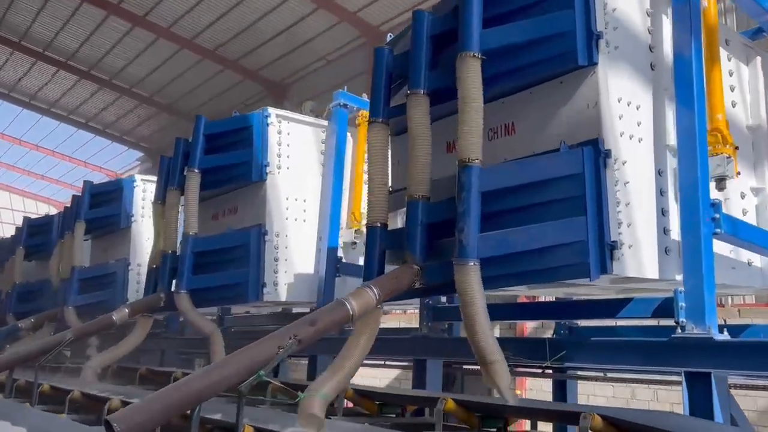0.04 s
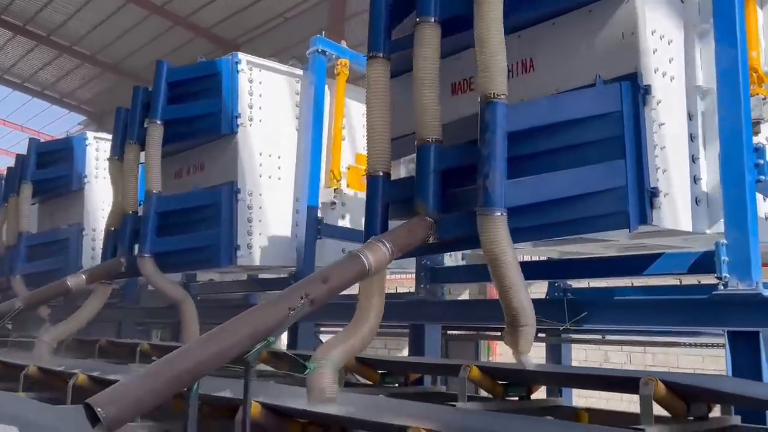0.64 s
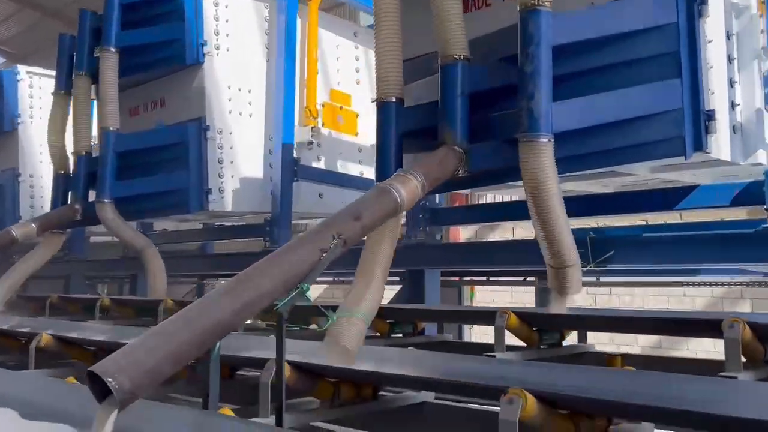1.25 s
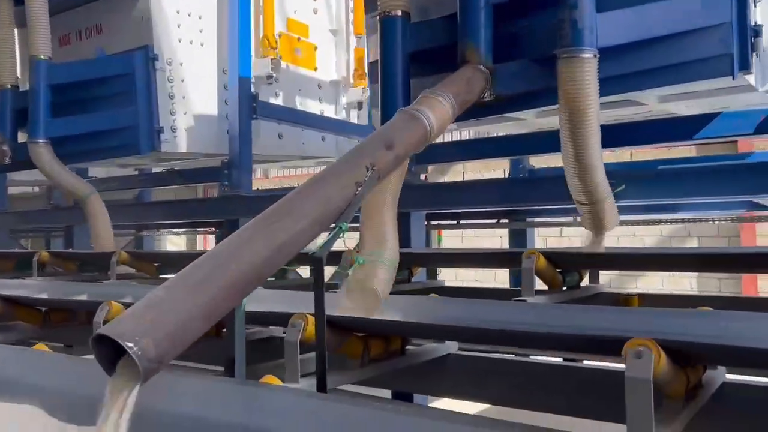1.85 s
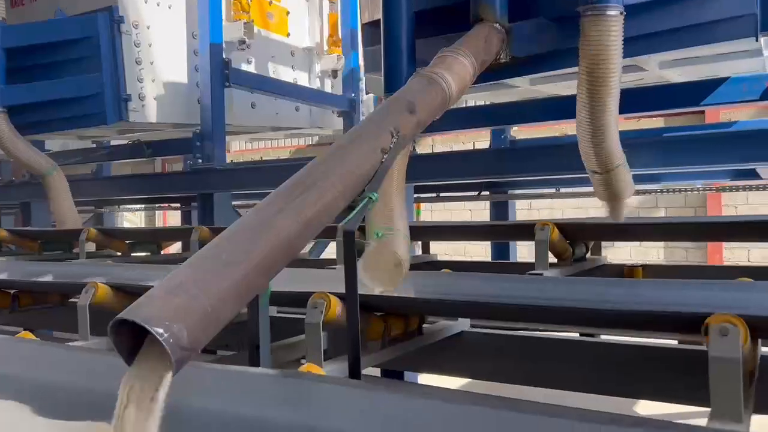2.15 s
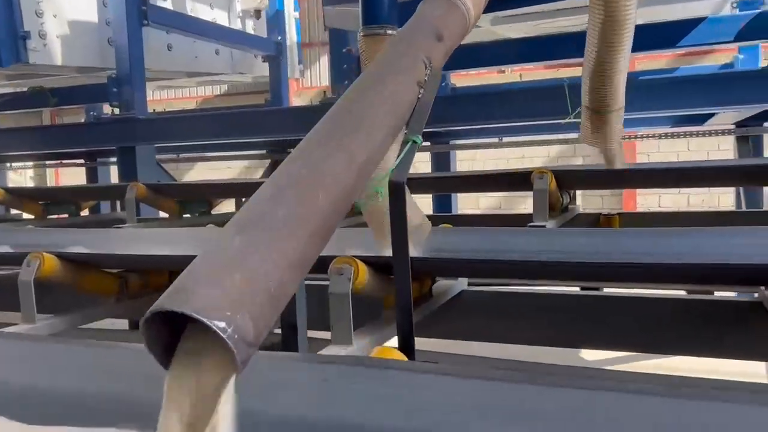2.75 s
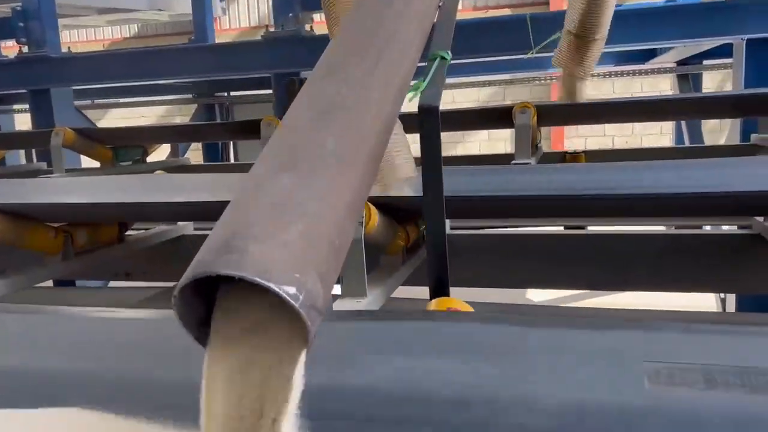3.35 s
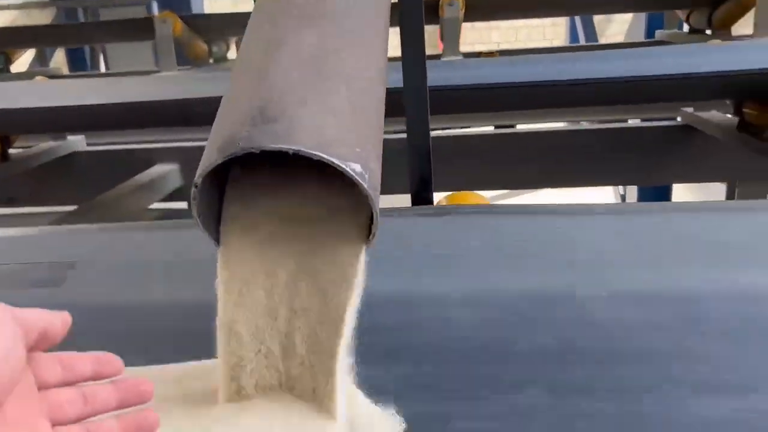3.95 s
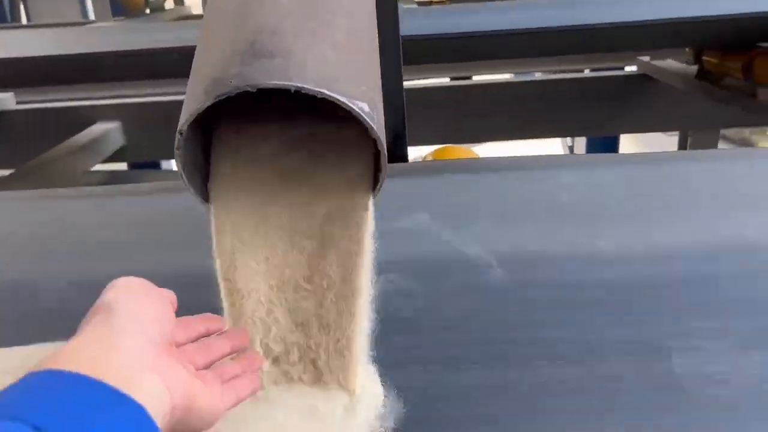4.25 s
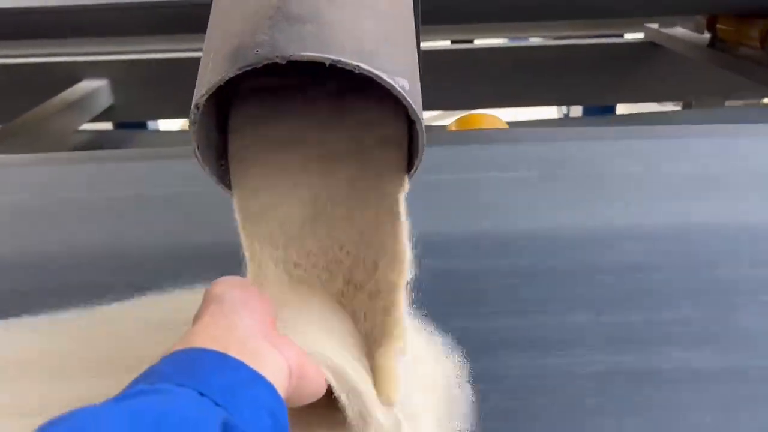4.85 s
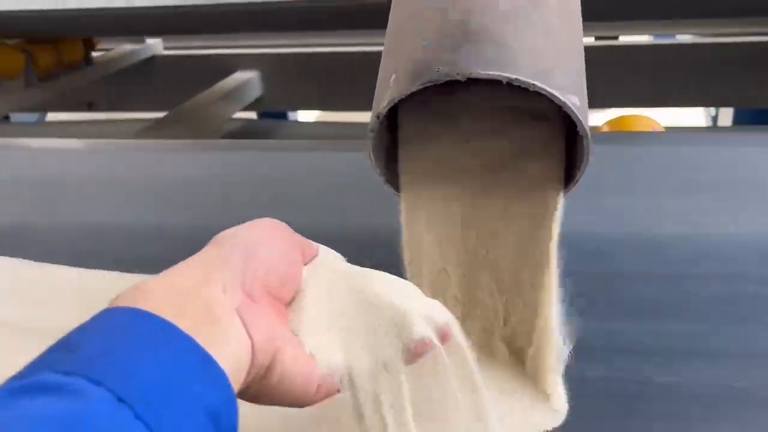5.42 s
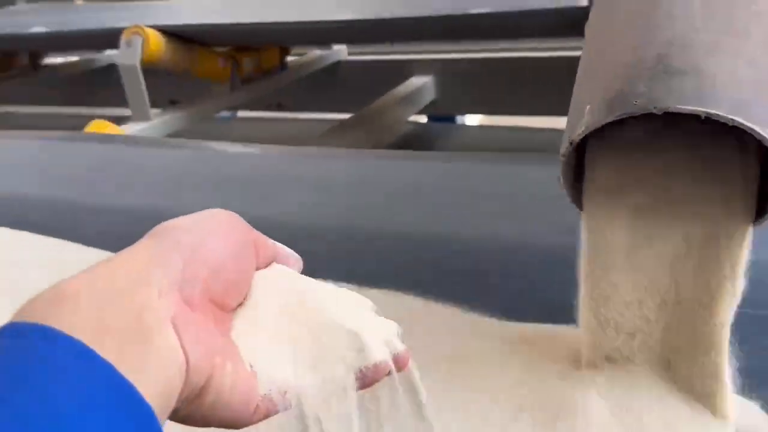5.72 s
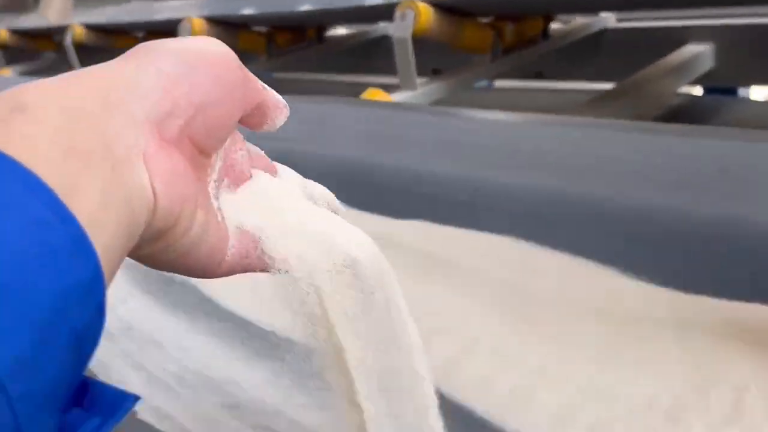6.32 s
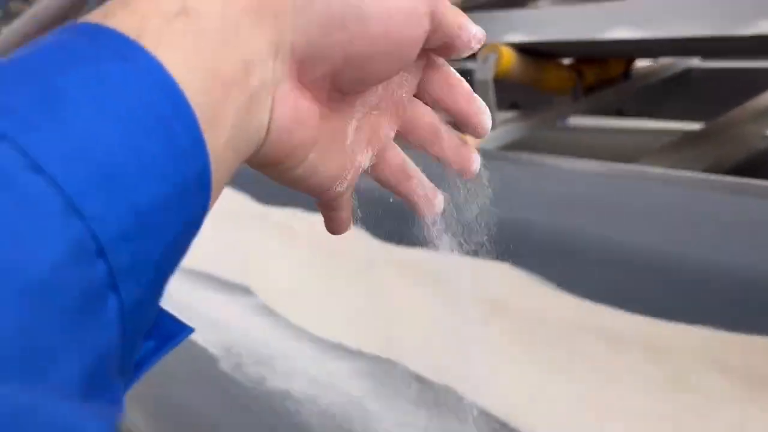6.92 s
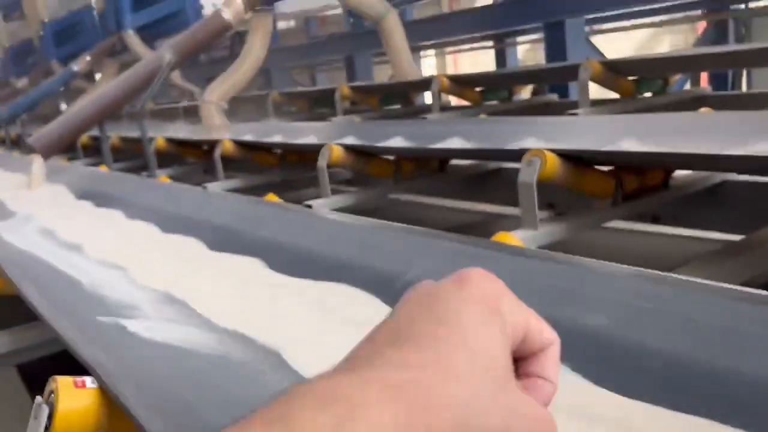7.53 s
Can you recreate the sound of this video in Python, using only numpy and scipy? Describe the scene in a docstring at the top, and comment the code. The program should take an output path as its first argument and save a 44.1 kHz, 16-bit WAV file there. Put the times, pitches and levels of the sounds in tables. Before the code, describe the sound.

Large vibrating sifters run throughout in an echoing factory hall: a deep steady roar, rattling screens and dull thumps about six times a second. A low boom and drone swell and sink, and motor bearings whine softly. Sand pouring from a pipe onto a conveyor belt adds a fine hiss, which grows as the microphone approaches, is strongest around 4.3 seconds and stays near until the end at about 7.5 seconds. Loose steel clanks and bounces in short bright clusters at about 1.1, 3, 4.8 and 6.6 seconds, the third softer and the last strongest, each ringing on in the hall. Small metal parts tick during the first two seconds. Distant steel scrapes come right at the start, then more faintly near 0.8, 2.5, 2.9 and 5.1 seconds. The bearings give brief faint squeals around 0.7, 1.7, 5.9 and 6.7 seconds.

```python
"""A row of big vibrating sifters roars, rattles and thumps in a steel hall.
Each stroke throws the load against a booming box; the frames hum and the motor bearings whine.
Sand pours from a pipe onto a conveyor belt, hissing more as the microphone comes near.
About every 1.8 s loose steel on the running line clanks and bounces, and the hall rings after it;
small parts tick and scrape in between."""
import sys
import numpy as np
from scipy import signal
from scipy.fft import rfft, irfft, next_fast_len
from scipy.io import wavfile
from scipy.ndimage import map_coordinates

SR = 44100
rng = np.random.default_rng(int(sys.argv[2]) if len(sys.argv) > 2 else 0)


def pcm_store(signal):
    """Save signal as 16-bit PCM."""
    levels = np.round(np.clip(np.atleast_2d(signal), -1, 1) * 32767)
    wavfile.write(sys.argv[1], SR, levels.astype(np.int16).T)


N = 334278

STROKE_HZ, FIRST_STROKE_S = 5.84, .135  # the beat of the sifters
# the deep roar of the sifter boxes: (frequency [Hz], relative level [dB])
ROAR_SPECTRUM = [(20, -40), (38, -26), (52, -11.5), (68, -6), (82, -9.5), (115, -4.5), (165, -0.5),
                 (200, -3.5), (240, -7), (290, -4), (350, -10.5), (500, -19.5), (800, -30.5), (2000, -86)]
# the brighter rattle of their screens: (frequency [Hz], relative level [dB])
RATTLE_SPECTRUM = [(150, -9.5), (450, 5), (700, 2.5), (1050, 1.5), (1450, -3), (2000, -6), (2400, -7),
                   (3000, -10.5), (3900, -14.5), (5400, -18.5), (7000, -19), (10000, -26), (16000, -51)]


def sifters(roar_db, rattle_db, throb_db, shake_db):
    """The boxes roar and their screens rattle, both swelling slightly with each stroke."""
    t = np.arange(N) / SR
    stroke = np.cos(2 * np.pi * STROKE_HZ * (t - FIRST_STROKE_S - THUMP_FADE_S))
    boxes = hall_noise(ROAR_SPECTRUM) * amp(roar_db + throb_db * stroke)
    screens = hall_noise(RATTLE_SPECTRUM) * amp(rattle_db + shake_db * stroke + 0.92 * wobble(14))
    return boxes * pan(db=-0.85) + screens * pan(db=0.5)


THUMP_RISE_S, THUMP_FADE_S = 0.0092, .028
# the dull thump of a stroke: (frequency [Hz], relative level [dB])
THUMP_SPECTRUM = [(50, -37), (100, -6), (155, 2.5), (185, -2), (240, -15), (330, -11.5), (600, -43),
                  (2000, -90)]
# the low notes of the box walls: (pitch [Hz], relative level [dB], pitch blur [Hz])
BOOM_TONES = [(156.5, -31.5, 2), (162.6, -38, 2), (168.5, -35, 2.172)]
# how the boom and the thumps swell and sink: (time [s], level change [dB])
BOOM_SWELL = [(0, 4.5), (.45, -11), (.7, -0.5), (1, 0.5), (2.3, 1.5), (2.8, 4), (3.9, -1), (4.3, 3.5),
              (4.7, 5.5), (5, -14), (5.35, 3), (5.85, -4), (7.2, -3.5)]


def thumps(thump_db):
    """Each stroke throws the load against the box, whose walls keep booming."""
    since_stroke = (np.arange(N) / SR - FIRST_STROKE_S) % (1 / STROKE_HZ)
    kick = unit((1 - np.exp(-since_stroke / THUMP_RISE_S)) * np.exp(-since_stroke / THUMP_FADE_S))
    thump = hall_noise(THUMP_SPECTRUM) * kick * pan(db=-0.5)
    return amp(over_time(BOOM_SWELL)) * (amp(thump_db) * thump + drifting_tones(BOOM_TONES))


# the low hum of the frames: (pitch [Hz], level [dB], pitch blur [Hz])
HUM_TONES = [(29.3, -57, .6), (90, -35, 0.7)]
# their drone around one higher note: (pitch [Hz], relative level [dB], pitch blur [Hz])
DRONE_TONES = [(290.7, -32.5, 14)]
# how the drone swells and sinks: (time [s], level change [dB])
DRONE_SWELL = [(0, -0.5), (.9, -7.5), (1.8, 2), (2.8, -1), (3.2, 6.5), (3.55, -10), (3.95, 2), (4.3, -8),
               (4.85, 5), (5.2, -4), (6.05, 5), (6.4, 2.5), (6.75, 3), (7.58, -5)]


def frames():
    """The shaking frames hum all the time; their drone swells and sinks."""
    return drifting_tones(HUM_TONES) + amp(over_time(DRONE_SWELL)) * drifting_tones(DRONE_TONES)


# the whine of the motor bearings: (pitch [Hz], relative level [dB], pitch blur [Hz])
WHINE_TONES = [(1059, -5, 6), (1260, -1, 11), (1317, -5.5, 4), (1865, -11, 4), (2752, -12, 4)]
# short squeals: (loudest moment [s], pitch [Hz], level [dB])
SQUEALS = [(.70, 1258, -44.5), (1.65, 1315, -44.5), (5.89, 1258, -43.5), (6.68, 1260, -47)]


def bearings(whine_db, half_squeal_s, blur_hz):
    """The bearings whine softly; now and then one runs dry and swells into an unsteady squeal."""
    t = np.arange(N) / SR
    waver = phase_drift(blur_hz, N)
    squeals = np.zeros(N)
    for s, hz, db in SQUEALS:
        swell = np.exp(-np.minimum(((t - s) / half_squeal_s) ** 2, 20))
        squeals += amp(db) * swell * np.sqrt(2) * np.sin(2 * np.pi * hz * t + waver)
    return amp(whine_db) * drifting_tones(WHINE_TONES) + squeals * pan(db=-2.0)


NEAR_SAND_DB, FAR_SAND_DB = -41.5, -41.5  # this stream at 1 m; all the other streams together
# the hiss of falling sand: (frequency [Hz], relative level [dB])
SAND_SPECTRUM = [(800, -20), (2500, -3.5), (4500, -.5), (7000, 0), (8000, 2.3), (9000, 3), (10300, 2),
                 (11000, -.5), (12400, -4.5), (13100, -6.5), (14000, -5), (15600, -3)]
# how alike the hiss is on the left and right: (frequency [Hz], likeness [1 = the same])
SAND_LIKENESS = [(3000, .4), (6500, .55), (7600, .7), (8400, .98)]


def sand(distance_m, grains_per_s, grain_db, clump_db):
    """Countless fine grains hiss on the belt, louder when near; a few coarse ones tick."""
    coarse = (rng.random(N) < grains_per_s / SR) * noise(N)
    stream = noise(N) + amp(grain_db) * unit(coarse)
    hiss = stereo(stream, SAND_SPECTRUM, SAND_LIKENESS)
    level = np.hypot(amp(NEAR_SAND_DB) / distance_m, amp(FAR_SAND_DB))
    return hiss * level * amp(clump_db * wobble(25)) * pan(db=2.0)


# first touches, hard blows and bounces: (time [s], crash level [dB], brightness [dB per octave],
# pitch [ratio], ring length [ratio], clink pitch [Hz], clink level [dB], left over right [dB])
CLANK_HITS = [ (1.124, -25.5, 0, 1.03, .4, 2400, -25, 4), (1.145, -33, .5, 1.03, .6, 8750, -35, 4),
              (1.156, -25, 0, 1.04, .75, 5540, -22, 5), (1.166, -32, 3, 1.04, 1.7, 2780, -29, 4),
              (1.202, -34, 1, 1.04, 1.2, 8750, -33, 4), (2.944, -29, -1, 1.0, .7, 2550, -28.5, 0),
              (2.975, -25.5, -3, 1.0, .7, 8270, -26.5, 0), (2.988, -29.5, -3, 1.02, 1, 2600, -30, 0),
              (3.008, -32.5, -1.5, 1.04, 1, 8200, -33, 0), (4.773, -36, 0, .99, .6, 8300, -36, -1),
              (4.783, -37, -1, .99, .6, 2330, -29, -1), (4.804, -29, -1.5, .98, .8, 2400, -27, -1),
              (4.819, -35, -1, .98, .8, 5280, -32, -1), (4.875, -40, -1, .98, .6, 5300, -40, -1),
              (4.965, -36.5, -3, 1.0, 1.2, 2350, -38, -1), (6.596, -29.5, 1, 1.0, .8, 5150, -34, 3),
              (6.608, -28.5, 1, 1.0, .7, 5120, -30, 3), (6.627, -24, 1, 1.0, .65, 5950, -27, 3),
              (6.635, -23.5, 2, 1.005, .8, 12100, -29, 3), (6.640, -30, 2, 1.06, 1, 5110, -28, 3),
              (6.660, -33, 1.5, 1.0, 1, 8280, -29, 3), (6.682, -47, 1, 1.0, 8, 2380, -36, 3), ]


def clanks(echo_db, clink_send_db, chatter_db):
    """Loose steel strikes a few times each turn of the line; the crash echoes and chatters as it dies."""
    crashes, clinks = np.zeros((2, 2, N))
    for s, db, tilt_db, pitch, length, clink_hz, clink_db, side_db in CLANK_HITS:
        add(crashes, s, crash(db, tilt_db, pitch, length) * pan(side_db))
        add(clinks, s, clink(clink_hz, clink_db, length) * pan(side_db))
    echo = hall(crashes + amp(clink_send_db) * clinks, build_s=0.03)
    return crashes + clinks + amp(echo_db + chatter_db * wobble(110)) * echo


# clusters of close notes in struck steel:
# (centre [Hz], width [Hz], relative level [dB], time to fade by 60 dB [s])
STEEL_NOTES = [(1370, 1100, -3.5, 0.19), (2250, 400, -5.5, 0.11), (2700, 780, -6, 0.16),
               (3280, 2000, -0.5, 0.19), (4070, 300, -16, 0.33), (4600, 880, -12.5, 0.29),
               (5250, 410, -3, 0.27), (5910, 590, -6.5, 0.26), (6960, 1600, -6, 0.23),
               (8200, 380, -1.5, 0.22), (8660, 800, -4.5, 0.18), (9300, 1400, -10, .15),
               (12100, 520, -19, 0.22)]


def crash(db, tilt_db, pitch, length=1, crack_db=-23, crack_fade_s=.04, rise_s=0.00022):
    """Steel meets steel: a crack, then many notes ring, more briefly if the parts stay pressed together."""
    t = np.arange(SR // 3) / SR
    ring = amp(crack_db - 60 * t / crack_fade_s) * noise(len(t))
    freqs = np.fft.rfftfreq(next_fast_len(len(t), True), 1 / SR)
    for hz, width, cluster_db, fade_s in STEEL_NOTES:
        band = np.exp(-2 * ((freqs - hz * pitch) / width) ** 2)
        phases = np.exp(2j * np.pi * rng.random((2, len(freqs))))
        cluster = unit(irfft(band * phases)[:, :len(t)])
        ring += cluster * amp(cluster_db - 60 * t / (fade_s * length))
    ring *= 1 - np.exp(-t / rise_s)
    # each contact has its own brightness, duller or sharper
    middle, side = filtered(ring, lambda hz: amp(tilt_db * np.log2(np.clip(hz, 1800, 12000) / 5000)))
    return amp(db - 5) * left_right(middle, amp(-7) * side)


def clink(hz, db, length=1, fade_s=.14, rise_s=0.0011, twin_db=-5, split=.022, blur=.014):
    """The struck spot sings with two close notes, split and blurred by a share of their pitch."""
    t = np.arange(2 * SR // 3) / SR
    waver = phase_drift(blur * hz, (2, len(t)))
    pair_hz = hz * (1 + np.array([[-1], [1]]) * split / 2)
    first, twin = np.sin(2 * np.pi * (pair_hz * t + rng.random((2, 1))) + waver)
    loudness = amp(db + 1.0 - 60 * t / (fade_s * length)) * (1 - np.exp(-t / rise_s))
    return (first + amp(twin_db) * twin)[None] * loudness


# light taps: (time [s], crash level [dB], clink pitch [Hz], clink level [dB])
TICK_HITS = [(.075, -40, 6800, -44), (0.134, -45, 1830, -29), (.155, -45, 5000, -38),
             (.170, -49, 1830, -35), (.192, -47, 6800, -37), (.205, -47, 2850, -35), (.245, -48, 3400, -39),
             (.415, -40, 12600, -42), (.470, -47, 8700, -40), (.806, -41, 8700, -34.5),
             (1.325, -42, 8700, -39), (1.741, -37.5, 4030, -41)]


def ticks(pitch, tilt_db, echo_db):
    """Small loose parts tap the same steel; they are bright and near, with little echo."""
    taps = np.zeros((2, N))
    for s, db, clink_hz, clink_db in TICK_HITS:
        add(taps, s, crash(db, tilt_db, pitch))
        add(taps, s, clink(clink_hz, clink_db))
    return taps + amp(echo_db) * hall(taps, build_s=0.018)


# distant scrapes: (loudest moment [s], level [dB], rise [s], fade [s])
SCRAPE_EVENTS = [(0.148, -31.5, .055, .09), (0.83, -36.5, .03, .06), (2.53, -39, .12, .03),
                 (2.87, -39.5, .05, .05), (5.12, -42, .08, .12)]
# the rasp of rubbing steel: (frequency [Hz], relative level [dB])
SCRAPE_SPECTRUM = [(500, -21), (1200, -11), (1850, 4), (2800, 2.5), (4000, -1.5), (5000, -2), (5900, -10),
                   (7000, -8), (9500, -18), (15000, -32)]


def scrapes(judder_db, echo_db):
    """Steel rubs on steel farther down the line, juddering, blurred by the hall."""
    t = np.arange(N) / SR
    push = np.zeros(N)
    for s, db, rise_s, fade_s in SCRAPE_EVENTS:
        push += amp(db) * np.exp(-np.maximum((s - t) / rise_s, (t - s) / fade_s))
    rub = hall_noise(SCRAPE_SPECTRUM) * push * amp(judder_db * wobble(90))
    return rub + amp(echo_db) * hall(rub, build_s=0.0073)


# how long the hall rings: (frequency [Hz], time to fade by 60 dB [s])
HALL_FADE = [(300, 1.5), (2400, 2.1), (5000, 1.08), (8000, 0.54), (14000, 0.19)]


def hall(sound, build_s, spread_db=-4):
    """The hall's echo builds up, then dies away, the highest sounds first."""
    hz, t, bands = signal.stft(noise(3 * SR // 2), SR, nperseg=256)
    decay = amp(-60 * t / at_hz(HALL_FADE, hz)[:, None]) * (1 - np.exp(-t / build_s))
    middle, side = signal.istft(bands * decay, SR, nperseg=256)[1]
    tail = left_right(middle, amp(spread_db) * side)
    return signal.fftconvolve(sound, tail / np.linalg.norm(tail[0]), axes=1)[:, :N]


# how alike the hall sounds on the left and right: (frequency [Hz], likeness [1 = the same])
HALL_LIKENESS = [(60, .992), (140, .965), (210, .9), (330, .85), (500, .62), (770, .33), (1200, .08),
                 (1800, -.02), (2800, .35), (6000, .4)]


def hall_noise(spectrum):
    """Noise that fills the hall; its low end is nearly the same on both sides."""
    return stereo(noise(N), spectrum, HALL_LIKENESS)


def drifting_tones(tones):
    """Machine tones reach each microphone by many paths, so they fade and drift."""
    t, out = np.arange(N) / SR, np.zeros((2, N))
    for hz, db, blur_hz in tones:
        phase = 2 * np.pi * hz * t
        middle, side = [unit(wobble(2 * blur_hz) * np.sin(phase) + wobble(2 * blur_hz) * np.cos(phase))
                        for _ in range(2)]
        middle_gain, side_gain = stereo_gains(HALL_LIKENESS, hz)
        out += amp(db) * left_right(middle_gain * middle, side_gain * side)
    return out * pan(db=-2.0)


def amp(db):
    """Turn decibels into a gain."""
    return 10 ** (np.asarray(db) / 20)


def unit(x):
    """Scale to an average power of 1."""
    return x / np.sqrt(np.mean(x ** 2) + 1e-20)


def noise(samples):
    """Two unrelated white noises."""
    return rng.standard_normal((2, samples))


def wobble(rate):
    """A smooth curve through rate random points a second."""
    points = rng.standard_normal(int(N * rate / SR) + 4)
    coarse = np.linspace(0, N, 4096)
    return np.interp(np.arange(N), coarse, map_coordinates(points, [coarse * rate / SR]))


def phase_drift(blur_hz, shape):
    """A wandering phase that blurs a tone's pitch."""
    return np.cumsum(rng.standard_normal(shape), axis=-1) * np.sqrt(2 * np.pi * blur_hz / SR)


def at_hz(table, hz):
    """Read a (frequency, value) table on a log axis."""
    freqs, values = np.transpose(table)
    return np.interp(np.log(hz + 1), np.log(freqs + 1), values)


def over_time(table):
    """Read a (time, value) table at every sample."""
    return np.interp(np.arange(N) / SR, *np.transpose(table))


def filtered(x, response):
    """Multiply each frequency in x by response(hz)."""
    n = x.shape[-1]
    padded = next_fast_len(n + 8192, True)
    return irfft(rfft(x, padded) * response(np.fft.rfftfreq(padded, 1 / SR)), padded)[..., :n]


def left_right(middle, side):
    """Left is middle plus side; right is middle minus side."""
    return middle + np.array([side, -side])


def stereo_gains(likeness, hz):
    """How much middle and side give this left-right likeness."""
    angle = np.arccos(np.clip(at_hz(likeness, hz), -1, 1)) / 2
    return np.array([np.cos(angle), np.sin(angle)])


def stereo(pair, spectrum, likeness):
    """Shape two unrelated signals into a left and right with this spectrum and likeness."""
    middle, side = filtered(pair, lambda hz: amp(at_hz(spectrum, hz)) * stereo_gains(likeness, hz))
    return unit(left_right(middle, side))


def pan(db):
    """Gains that make the left db louder than the right."""
    return amp(np.array([[db], [-db]]) / 2)


def add(track, s, sound):
    """Mix a sound in at s seconds."""
    start = max(round(s * SR), 0)
    track[:, start:start + sound.shape[-1]] += sound[:, :N - start]


SHADE_DB, SHADE_M = 6, 1  # the belt blocks some rattle: the loss right beside it, and its reach
# the walk up to the pipe and on along the belt: (time [s], distance from the falling sand [m])
WALK_PATH = [(0, 4.1), (2.0, 1.56), (3.1, 1.24), (4.3, 0.79), (5.7, 1.05), (6.5, 0.95), (7.58, 1.3)]


def scene():
    """Sifters, motors, sand and loose steel; nearing the belt raises the hiss and softens the rattle."""
    distance_m = over_time(WALK_PATH)
    shade_db = SHADE_DB * np.exp(-distance_m / SHADE_M)
    machines = sifters(roar_db=-18, rattle_db=-28.5 - shade_db, throb_db=0.13, shake_db=0.28)
    machines += thumps(thump_db=-27.5)
    drives = bearings(whine_db=-44, half_squeal_s=0.11, blur_hz=22) + frames()
    pour = sand(distance_m, grains_per_s=400, grain_db=-9.5, clump_db=0.87)
    steel = clanks(echo_db=-3, clink_send_db=-15, chatter_db=1.5)
    steel += ticks(pitch=0.97, tilt_db=2.5, echo_db=-7)
    steel += scrapes(judder_db=2, echo_db=-2.5)
    return machines + drives + pour + steel


TOP_HZ = 15800
# how much stereo width the microphones keep: (frequency [Hz], share [0 to 1])
MIC_WIDTH = [(7000, 1), (8500, .1), (9500, .03)]
# how far the left wave runs ahead of the right: (frequency [Hz], phase lead [radians])
MIC_PHASE = [(1200, 0), (2800, .4), (7500, .4), (8400, 0), (8950, -.7), (9650, -2.8), (10300, -3.14),
             (10900, -3.6), (11400, -6.1), (12500, -6.5), (13250, -9.2), (14400, -9.7), (15000, -12.4)]


def record(dry):
    """The microphone pair narrows the highs, turns them in and out of phase and cuts all above TOP_HZ."""
    left, right = dry
    side = filtered((left - right) / 2, lambda hz: at_hz(MIC_WIDTH, hz))
    narrowed = left_right((left + right) / 2, side)
    lead_share = np.array([[.5], [-.5]])
    return filtered(narrowed, lambda hz: np.exp(1j * lead_share * at_hz(MIC_PHASE, hz)) * (hz < TOP_HZ))


dry = scene()
out = record(dry)
pcm_store(out)
```